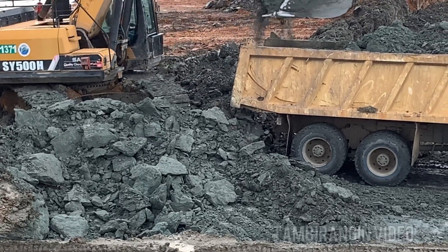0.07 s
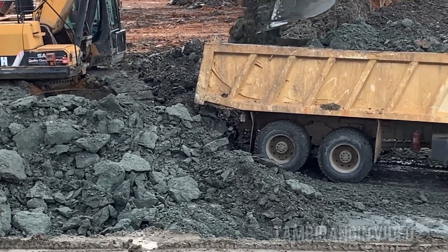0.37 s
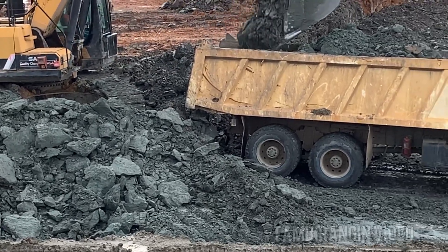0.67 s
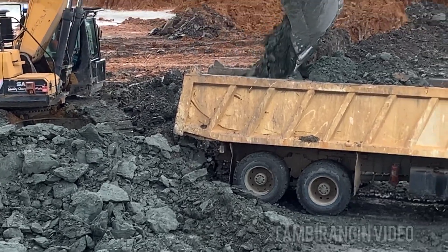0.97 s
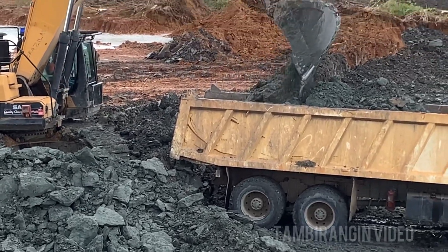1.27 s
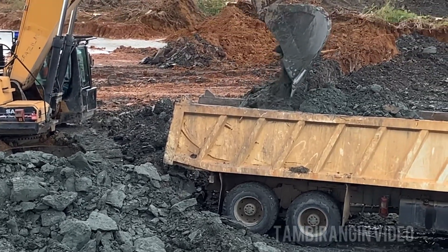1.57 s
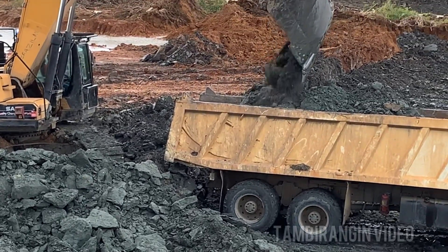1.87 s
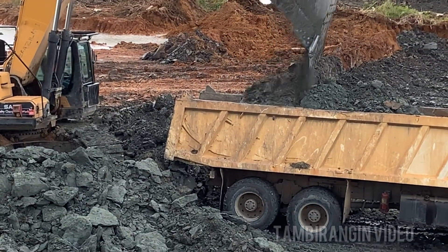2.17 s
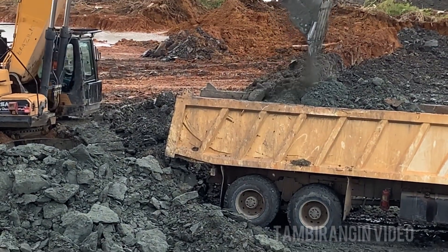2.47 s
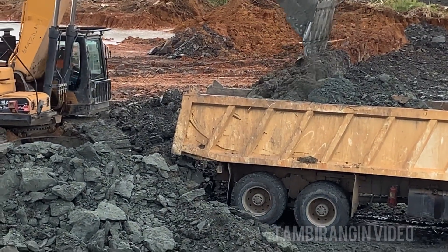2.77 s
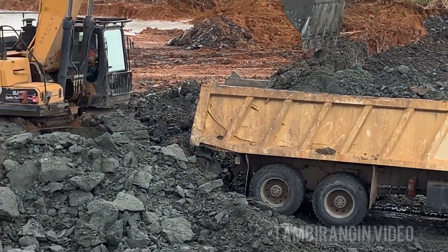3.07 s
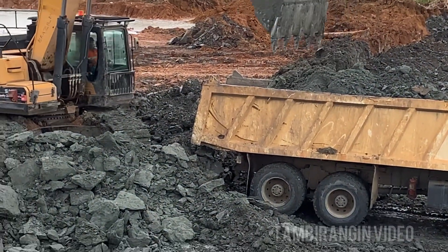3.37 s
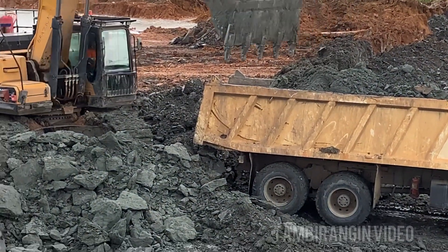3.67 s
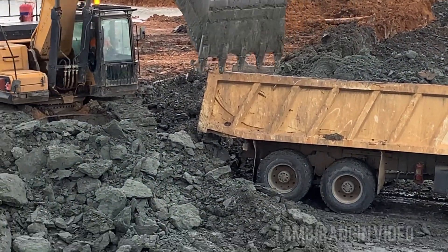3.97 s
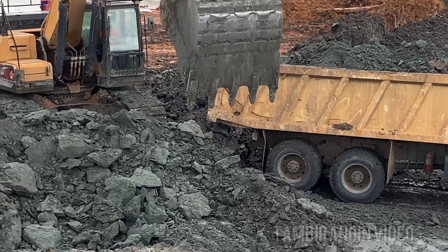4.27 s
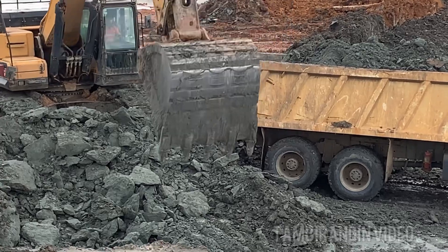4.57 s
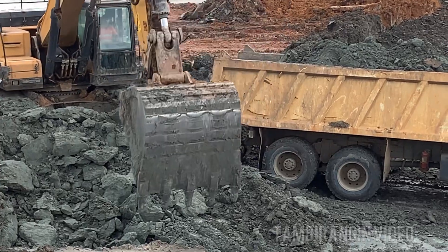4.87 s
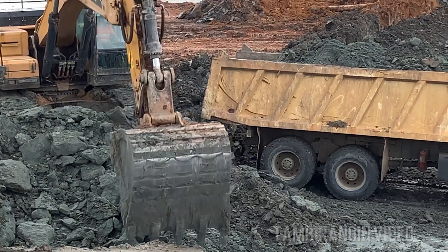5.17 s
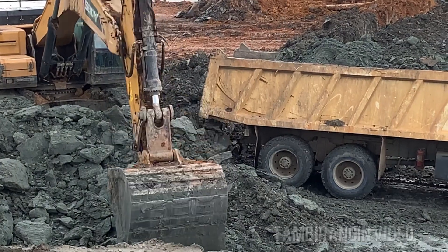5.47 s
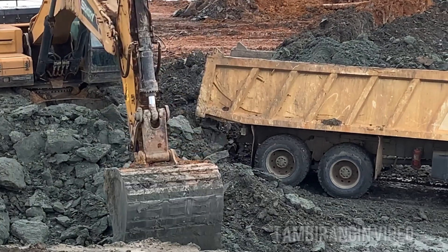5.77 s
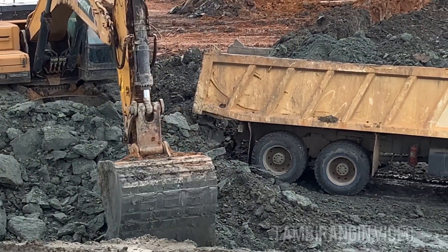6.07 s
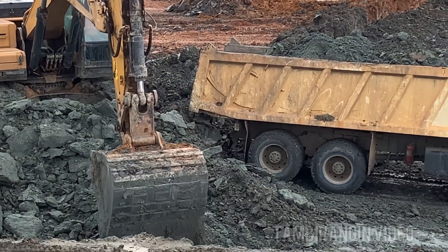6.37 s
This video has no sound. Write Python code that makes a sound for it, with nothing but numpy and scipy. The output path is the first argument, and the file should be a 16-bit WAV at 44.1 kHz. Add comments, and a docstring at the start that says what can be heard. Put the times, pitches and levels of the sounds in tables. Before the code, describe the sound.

An excavator's diesel roars and clatters steadily some way off in an open pit, with a tipper truck idling underneath and hydraulic hiss rising and falling. A stone cracks at 0.2 seconds. From about 0.5 seconds rocks and gravel pour into the truck, knocking the steel bucket over a low rumble and hum. Heavy, booming thumps and ringing knocks land around 1.2 seconds, with smaller crunches until 2 seconds and gravel trickling on until about 3.2. The engine drone swells near 2.5 seconds, then eases. Around 3.6 seconds the empty bucket rattles dully on its pins. Stones crunch near 4.4 seconds, and a loud cluster of metal clanks follows at 4.7. Scattered rocks fall as the rumble grows again. At about 5.9 seconds the bucket teeth bite into the pile, ringing as stone splits and grinds, with one more crunch at 6.2.

```python
"""A diesel roars some way off in an open pit: an excavator loading an idling tipper truck.
Its engine covers ring and oil hisses through the valves as the arm moves. Rocks and gravel drop
onto the load, knocking the steel bucket and booming in the tipper body. The bucket swings back
empty, rattles and clanks on its pins, then bites into the rock pile with ringing teeth."""
import sys
import numpy as np
from scipy.fft import rfft, irfft, next_fast_len
from scipy.io import wavfile
from scipy.ndimage import map_coordinates

SR = 44100
rng = np.random.default_rng(int(sys.argv[2]) if len(sys.argv) > 2 else 0)


def generate_wav(sig):
    """Save sig (samples, or channels by samples) to the path in sys.argv[1] as 16-bit PCM at SR."""
    pcm = np.round(np.clip(np.atleast_2d(sig).T, -1, 1) * 32767).astype(np.int16)
    wavfile.write(sys.argv[1], SR, pcm)


N = 283563
SIDE = np.array([[1], [-1]])  # left, right in opposite polarity


def amp(db):
    return 10 ** (np.asarray(db) / 20)


def unit(x):
    return x / np.sqrt(np.mean(x ** 2) + 1e-20)


def curve(points):
    """Per-sample line through (time_s, value) points."""
    return np.interp(np.arange(N) / SR, *np.transpose(points))


def wobble(rate_hz):
    """Smooth random curve, rate_hz knots a second."""
    knots = rng.standard_normal(int(N * rate_hz / SR) + 4)
    return map_coordinates(knots, [np.arange(N) * rate_hz / SR])


def filtered(x, response):
    """Apply a complex frequency response."""
    size = next_fast_len(N + 8192)
    return irfft(rfft(x, size) * response(np.fft.rfftfreq(size, 1 / SR)), size)[..., :N]


def shape(spectrum):
    """Response through (freq_hz, gain_db) points on a log axis."""
    freq_hz, gain_db = np.transpose(spectrum)
    return lambda hz: amp(np.interp(np.log(hz + 1), np.log(freq_hz), gain_db))


def noise(response):
    """Coloured noise, rms 1."""
    return unit(filtered(rng.standard_normal(N), response))


def spread(spectrum, side_db):
    """Stereo noise, rms 1; the pit walls scatter part of it sideways."""
    response = shape(spectrum)
    return unit(noise(response) + amp(side_db) * noise(response) * SIDE)


def arrive(x, lead_s):
    """Sound reaches the left microphone lead_s before the right."""
    return filtered(x, lambda hz: np.exp(1j * np.pi * hz * lead_s * SIDE))


def impacts(starts_s, levels_db, t60_s, rise_s):
    """Envelope of fast-rising, decaying blows, summed in power."""
    power, t = np.zeros(N + SR), np.arange(SR // 2) / SR
    for start, db, t60 in np.broadcast(starts_s, levels_db, t60_s):
        envelope = amp(db - 60 * t / t60) * (1 - np.exp(-t / rise_s))
        power[round(start * SR):][:len(t)] += envelope ** 2
    return np.sqrt(power[:N])


def crumble(rate_hz, depth_db):
    """Uneven gain of stone breaking in many small contacts."""
    return unit(amp(depth_db * np.clip(wobble(rate_hz), -2, 2)))


def rotation(hz, drift):
    """Angle in radians at a slightly drifting speed."""
    return 2 * np.pi * np.cumsum(hz * (1 + drift * wobble(1.925))) / SR


def exhaust(crank, orders, waver_db):
    """Tones locked to the crank, wavering in the open air."""
    out = 0
    for order, db in orders:
        peak = np.sqrt(2) * amp(db + waver_db * wobble(3.89))
        out += peak * np.sin(order * crank + rng.uniform(0, 2 * np.pi))
    return out


def steel(modes, contacts, ref_t60_s, spot_db):
    """Each contact rings the modes, lifting those near its spot_hz by up to spot_db."""
    t = np.arange(SR // 7) / SR
    hz, width_hz, mode_db = np.transpose(modes)[:, :, None]
    t60_s = ref_t60_s * (1400 / hz) ** .3
    fade = amp(-60 * t / t60_s) * (1 - np.exp(-t / .0006))
    out = np.zeros((2, N + SR))
    for start_s, db, spot_hz in contacts:
        lift_db = spot_db * np.exp(-(np.log(hz / spot_hz) / .15) ** 2)
        gain = amp(mode_db + lift_db + 2 * rng.standard_normal(hz.shape))
        pitch_hz = hz * (1 + .009 * rng.standard_normal(hz.shape))  # the load detunes the modes
        # chattering contact jogs each phase, widening the line
        jog = np.cumsum(rng.standard_normal((len(hz), len(t))), axis=1) * np.sqrt(np.pi * width_hz / SR)
        phase = 2 * np.pi * (pitch_hz * t + rng.random(hz.shape)) + jog
        skew_rad = .5 * rng.standard_normal(hz.shape)
        ring = np.array([np.sum(gain * fade * np.sin(phase + side * skew_rad), axis=0) for side in SIDE])
        out[:, round(start_s * SR):][:, :len(t)] += amp(db) * np.sqrt(2) * ring / np.linalg.norm(gain)
    return out[:, :N]


# low exhaust tones: crank_order, level_db
DRONE_ORDERS = [(4, -37), (6, -25.5), (12, -46.5)]
# upper exhaust tones: crank_order, level_db
GROWL_ORDERS = [(7.5, -38), (10, -40), (14, -38), (15, -39.5), (18, -44)]
# drone, up while tipping, down while slewing back: time_s, gain_db
DRONE_SWELL = [(0, 1), (1.3, 2), (2.5, 5.5), (3.4, -1.5), (4.25, 0), (4.45, -2), (4.75, -1.5), (6.43, 1)]
# roar, up as the arm swings down: time_s, gain_db
ROAR_SWELL = [(0, 0), (3.7, -0.46), (4.2, 0), (4.62, 1), (4.95, -0.5), (6.43, 0)]
# direct roar spectrum: freq_hz, gain_db
ROAR = [(20, -50), (32, -24), (46, -9), (62, -9), (95, -2), (126, -6.5), (175, 1.5), (230, -1.5), (290, 0),
        (360, -3.5), (480, -6), (620, -14.5), (760, -16), (900, -22), (1800, -94)]
# scattered roar spectrum: freq_hz, gain_db
SCATTERED_ROAR = [(22, -40), (55, 6), (90, 8), (125, 0), (175, 6), (280, 2), (480, 2.5), (650, -6.5),
                  (770, -12), (850, 4.5), (980, -40), (1800, -32.5)]
# diesel clatter spectrum: freq_hz, gain_db
CLATTER = [(400, -18), (800, 7), (1100, 6), (1450, 0), (1800, -2.5), (2300, 0), (3000, -2.5), (3500, -6.5),
           (4400, -8.5), (5400, -14.5), (8000, -25), (14000, -103)]
ENGINE_LEAD_S = .00022

def excavator_diesel():
    """Governed diesel: exhaust tones, a throbbing roar and clatter that pulses at each firing."""
    crank = rotation(hz=27.68, drift=.0014)
    firing = np.cos(3 * crank)  # six cylinders, three firings a turn
    throb = np.cos(crank / 2 + 1.6 * wobble(3.93))  # unequal cylinders repeat every second turn
    drone = amp(curve(DRONE_SWELL)) * exhaust(crank, DRONE_ORDERS, waver_db=1.5)
    drone *= 1 + .25 * throb + .35 * wobble(13)
    growl = exhaust(crank, GROWL_ORDERS, waver_db=4) * (1 + .35 * wobble(25))
    roar = amp(-17 + curve(ROAR_SWELL) + .24 * wobble(6.5)) * noise(shape(ROAR))
    roar *= 1 + .088 * throb + .088 * wobble(22) + .021 * firing
    scattered = amp(-28.5) * noise(shape(SCATTERED_ROAR)) * SIDE
    clatter = spread(CLATTER, side_db=1) + amp(-5) * arrive(noise(shape(CLATTER)), lead_s=.00019)
    clatter = amp(-33) * unit(clatter) * (1 + .049 * firing + .13 * wobble(25))
    return arrive(roar + drone + growl, ENGINE_LEAD_S) + scattered + clatter


# steel bucket modes: pitch_hz, width_hz, gain_db
BUCKET_MODES = [(655, 35, -1), (945, 45, -2), (1150, 50, 1), (1365, 55, 3), (1580, 60, -5), (1790, 70, -6),
                (2130, 70, -3), (2350, 90, -5), (2730, 60, -8), (3110, 70, -7), (3850, 70, -14),
                (4140, 30, -18), (4680, 40, -13), (7190, 70, -17), (7980, 130, -18), (11500, 150, -26)]
# blows on the bucket: start_s, ring_db, spot_hz, stone_db
BUCKET_BLOWS = [(.569, -24.5, 2130, -27), (.573, -25.5, 4680, -22), (.578, -27, 3110, -27),
                (.586, -27, 1280, -28), (1.074, -24.5, 1400, -27), (1.155, -22, 1240, -26),
                (1.17, -18.5, 1950, -19.5), (1.174, -20, 655, -24), (1.182, -19, 1365, -26),
                (1.184, -29, 3110, -33), (1.189, -29, 4680, -33), (1.191, -20, 1300, -28),
                (1.203, -22, 655, -28), (1.221, -34, 4140, -31), (3.627, -32, 2350, -45),
                (3.78, -36, 2350, -43), (4.594, -31, 2100, -35), (4.62, -32, 2750, -31),
                (4.64, -29, 4140, -26), (4.657, -16, 1365, -18), (4.667, -17, 1365, -23),
                (4.669, -26, 7600, -22), (4.677, -23, 2730, -20.5), (4.683, -20, 7190, -27),
                (4.686, -18, 800, -30), (4.697, -16, 2350, -28), (4.704, -12.5, 1230, -32),
                (4.703, -30, 3870, -33), (4.713, -27, 2360, -33), (4.725, -29, 7190, -35),
                (4.726, -26, 2350, -29), (4.753, -25, 2130, -23)]
# stone crunch spectrum: freq_hz, gain_db
STONE = [(300, -18), (700, 20.5), (1400, 3), (2400, 5.5), (3300, -5), (5000, -6), (8000, -38), (14000, -61)]
# grit spectrum: freq_hz, gain_db
GRIT = [(1500, 4), (3000, 23), (5000, 6), (7200, 18), (9000, -33), (14000, -26)]

def bucket():
    """Stone scrapes up to each blow and grinds after it; the steel rings and rebounds once."""
    scrape_s, scrape_db = .04, -10
    rebound_s, rebound_db = .012, -21.5
    start_s, ring_db, spot_hz, stone_db = np.transpose(BUCKET_BLOWS)
    contacts = [*zip(start_s, ring_db, spot_hz), *zip(start_s + rebound_s, ring_db + rebound_db, spot_hz)]
    ring = steel(BUCKET_MODES, contacts, ref_t60_s=.095, spot_db=19)
    scrape_power = sum(curve([(at - scrape_s, 0), (at, amp(db + scrape_db) ** 2), (at + rebound_s, 0)])
                       for at, db in zip(start_s, stone_db))
    grind = impacts(start_s, stone_db, t60_s=.15, rise_s=.00041)
    stone = spread(STONE, side_db=-7) + amp(-16) * spread(GRIT, side_db=3)
    return ring + np.sqrt(scrape_power + grind ** 2) * stone * crumble(rate_hz=350, depth_db=3)


# rocks landing: start_s, crunch_db, grit_db
LANDINGS = [(0.219, -29, -32.5), (.495, -32, -43), (1.023, -25.5, -42), (1.25, -26, -44), (1.377, -22, -38),
            (1.394, -40, -35), (1.427, -40, -36.5), (1.831, -29, -38), (1.862, -31, -41), (1.912, -33, -49),
            (4.385, -29, -41), (4.433, -27.5, -42), (4.941, -23, -31.5), (5.144, -25, -34),
            (5.179, -25, -38), (5.45, -31, -48), (5.803, -26.5, -39), (6.243, -25, -36.5)]
# splitting stone spectrum: freq_hz, gain_db
CRACK = [(2000, -23), (4500, 13), (7500, 4), (10500, 4), (14000, 9.5)]

def rocks():
    """Landing rocks crunch and scatter grit; one splits."""
    start_s, crunch_db, grit_db = np.transpose(LANDINGS)
    crunch = impacts(start_s, crunch_db, t60_s=.2, rise_s=.0014) * spread(STONE, side_db=-21)
    grit = impacts(start_s, grit_db, t60_s=.12, rise_s=.00045) * spread(GRIT, side_db=-13)
    crack = impacts(starts_s=.216, levels_db=-22, t60_s=.1, rise_s=.0011) * spread(CRACK, side_db=1)
    return crunch + grit + crack


# low thumps: start_s, level_db, pitch_hz, t60_s
THUMPS = [(1.172, -14, 62, .28), (1.184, -8, 80, .14), (1.25, -10, 98, .38), (4.678, -7.5, 220, .07)]

def thumps():
    """Heavy rocks land in the tipper; later the empty bucket clanks."""
    t = np.arange(N) / SR
    return sum(impacts(at, db, t60_s, rise_s=.0012) * np.sin(2 * np.pi * hz * (t - at))
               for at, db, hz, t60_s in THUMPS)


# bucket tooth modes: pitch_hz, width_hz, gain_db
TOOTH_MODES = [(1550, 60, -8.5), (1720, 80, -13), (2070, 70, -4.5), (2190, 80, -10), (2800, 110, -11),
               (3060, 55, -6), (3950, 160, -20), (4440, 70, -17), (4750, 70, -16), (4940, 110, -17),
               (6550, 150, -17), (7170, 90, -14.5), (7830, 100, -13), (11030, 200, -18)]
# teeth touch, bite, grind on: start_s, ring_db, spot_hz, crunch_db, crack_db
BITES = [(5.887, -24, 1550, -20, -37), (5.895, -13, 5060, -22, -17.5), (5.91, -21, 1550, -18, -27),
         (5.93, -24, 1550, -17, -44), (5.951, -29, 7500, -20, -31), (5.965, -28, 6000, -19, -32),
         (5.995, -29, 2070, -18.5, -52)]
# crushed rock spectrum: freq_hz, gain_db
PILE = [(250, -11), (600, 6.5), (1200, 1.5), (2600, -8), (5000, -23), (12000, -49)]

def teeth():
    """The teeth ring as they hit the pile; stone splits and grinds under them."""
    start_s, ring_db, spot_hz, crunch_db, crack_db = np.transpose(BITES)
    ring = steel(TOOTH_MODES, zip(start_s, ring_db, spot_hz), ref_t60_s=.125, spot_db=9)
    crunch = impacts(start_s, crunch_db, t60_s=.15, rise_s=.003) * spread(PILE, side_db=-10)
    crack = impacts(start_s, crack_db, t60_s=.1, rise_s=.00075) * spread(CRACK, side_db=0)
    return ring + (crunch + crack) * crumble(rate_hz=200, depth_db=-.5)


# pin knocks as the arm starts back: start_s, level_db
RATTLES = [(3.615, -26), (3.637, -31), (3.661, -35), (3.692, -28), (3.722, -32)]
# pin knock spectrum: freq_hz, gain_db
PINS = [(400, -12), (800, -6), (1350, 2), (1800, -5), (2300, -7), (3100, -13), (5000, -32)]

def linkage():
    """Loose pins of the empty bucket chatter dully."""
    start_s, level_db = np.transpose(RATTLES)
    knocks = impacts(start_s, level_db, t60_s=.2, rise_s=.002)
    return knocks * spread(PINS, side_db=-6) * crumble(rate_hz=230, depth_db=.5)


# oil flow through the valves: time_s, level_db
OIL_FLOW = [(0, -40.5), (.35, -36.5), (.65, -38.5), (1.15, -36), (1.42, -42), (1.72, -38.5), (2.1, -40),
            (2.32, -33), (2.65, -38), (3.2, -37.5), (3.55, -42), (3.8, -39.5), (4.45, -37), (4.9, -35),
            (5.1, -40), (5.35, -37.5), (5.75, -46), (6.43, -40.5)]
# valve hiss spectrum: freq_hz, gain_db
HISS = [(2500, -24), (4500, 4), (6000, -5), (6800, -4), (8400, -2.5), (11000, -1), (13000, -2.5),
        (14000, 1.5)]

def hydraulics():
    """Oil hisses in the valves, louder while arm and bucket move."""
    direct = arrive(noise(shape(HISS)), lead_s=-.00021) * SIDE
    diffuse = amp(-14) * spread(HISS, side_db=0)
    return amp(curve(OIL_FLOW) + 1.35 * wobble(21.09)) * unit(direct + diffuse)


# boom of the load pouring, then the arm lowering: time_s, level_db
RUMBLE = [(0, -37), (.7, -23), (1.2, -26), (1.5, -36), (2.1, -30.5), (4.7, -29), (5.1, -23.5), (5.9, -26),
          (6.43, -29)]

def rumble():
    """Tipper body and arm boom under shifting weight."""
    spectrum = [(20, -36), (42, -2), (62, 16), (95, 14), (130, 5.5), (300, -86)]
    return amp(curve(RUMBLE)) * spread(spectrum, side_db=-10.5)


# truck exhaust tones: crank_order, level_db
TRUCK_ORDERS = [(3, -50), (4, -46), (6, -29)]

def truck_idle():
    """Exhaust tones of the waiting truck's slow diesel."""
    crank = rotation(hz=10.08, drift=.002)
    return arrive(exhaust(crank, TRUCK_ORDERS, waver_db=1.5), ENGINE_LEAD_S)


# low hum: time_s, level_db
HUM = [(0, -46), (.5, -26), (1.15, -26), (1.55, -47), (2.1, -29), (2.5, -30), (2.9, -41), (6.43, -31.5)]

def hum():
    """A low tone that swells while the bucket tips."""
    tone = np.sqrt(2) * np.sin(rotation(hz=91.5, drift=.0036))
    return arrive(amp(curve(HUM)) * tone, ENGINE_LEAD_S)


# engine cover modes: pitch_hz, width_hz, level_db
COVER_MODES = [(823, 30, -43), (928, 93, -41), (1120, 200, -43), (1232, 42, -48.5), (1382, 76, -46),
               (1622, 140, -48), (2048, 76, -49.5), (2220, 120, -50), (2720, 270, -50), (3160, 76, -49),
               (3980, 240, -60.5), (4390, 82, -59), (4740, 160, -73), (5450, 240, -66)]

def covers():
    """The engine shakes its covers; each resonance swells and fades on its own."""
    out = 0
    for hz, width_hz, db in COVER_MODES:
        ring = noise(lambda f: (1j * f * width_hz / (hz * hz - f * f + 1j * f * width_hz)) ** 2)
        out += amp(db) * unit(ring * amp(2.8 * wobble(14)))
    return arrive(out, lead_s=.00013)


def gravel(count=5500):
    """Small stones clink at random pitches and sizes: a pour from the tipped bucket, else crumbs."""
    from_s, to_s, fade_s = .43, 3.2, .23
    pour_db, crumbs_db = -43, -48.5
    when, pitch, smallness = rng.random((3, count, 1))
    t = np.arange(SR // 50) / SR
    hz = 1400 * 3.6 ** pitch
    size = amp(-20 * smallness) / np.sqrt(hz)
    envelope = amp(-60 * t / .02) * (1 - np.exp(-t / .0005))
    clinks = size * envelope * np.sin(2 * np.pi * hz * t)
    samples = (when * N).astype(int) + np.arange(len(t))
    trickle = np.bincount(samples.ravel(), clinks.ravel(), N)[:N] * crumble(rate_hz=27, depth_db=1)
    flow_db = curve([(from_s - fade_s, crumbs_db), (from_s, pour_db),
                     (to_s, pour_db), (to_s + fade_s, crumbs_db)])
    return amp(flow_db) * arrive(unit(trickle), lead_s=.00008)


def scene():
    """Machines and rock, heard across the pit."""
    digging = excavator_diesel() + bucket() + rocks() + thumps() + teeth() + linkage() + hydraulics()
    return digging + rumble() + truck_idle() + hum() + covers() + gravel()


# microphone balance: freq_hz, left_minus_right_db
BALANCE = [(30, 8), (62, 0.5), (125, -4), (250, 0.4), (500, 1.5), (1000, 1), (2000, 0.5), (4000, -0.5),
           (8000, 0)]

def record(dry, cutoff_hz=13900):
    """Two band-limited microphones of slightly different colour."""
    return filtered(dry, lambda hz: shape(BALANCE)(hz) ** (SIDE / 2) * (hz < cutoff_hz))


dry = scene()
out = record(dry)
generate_wav(out)
```